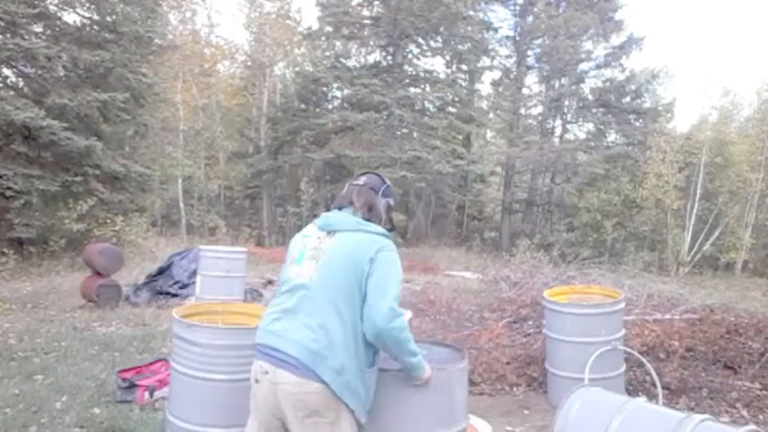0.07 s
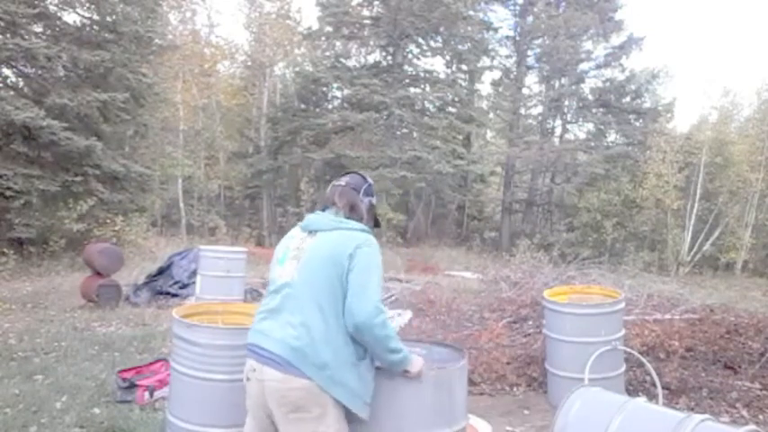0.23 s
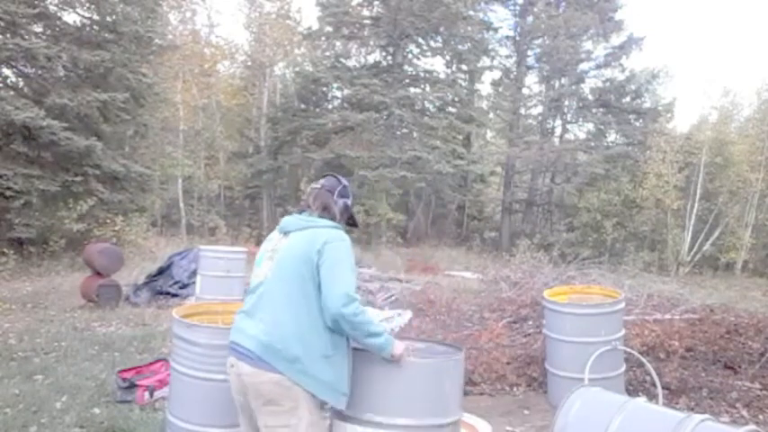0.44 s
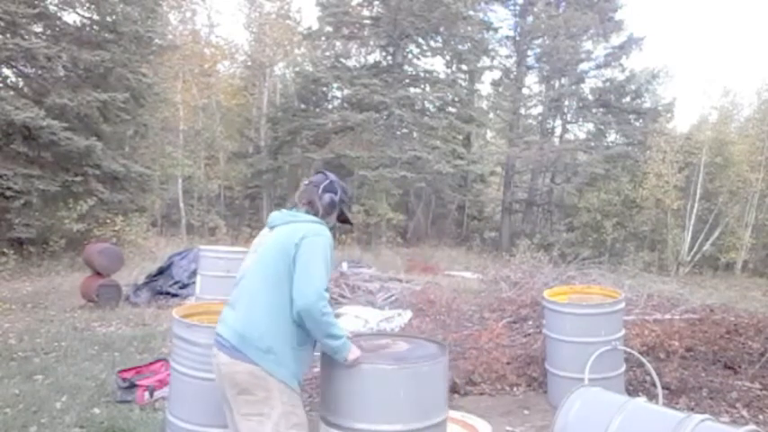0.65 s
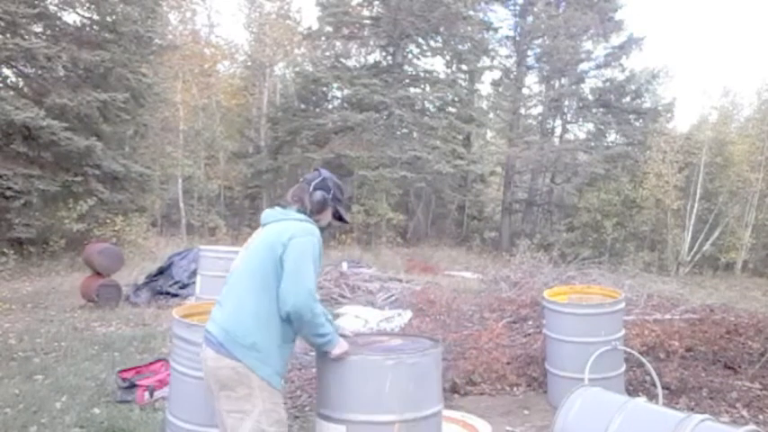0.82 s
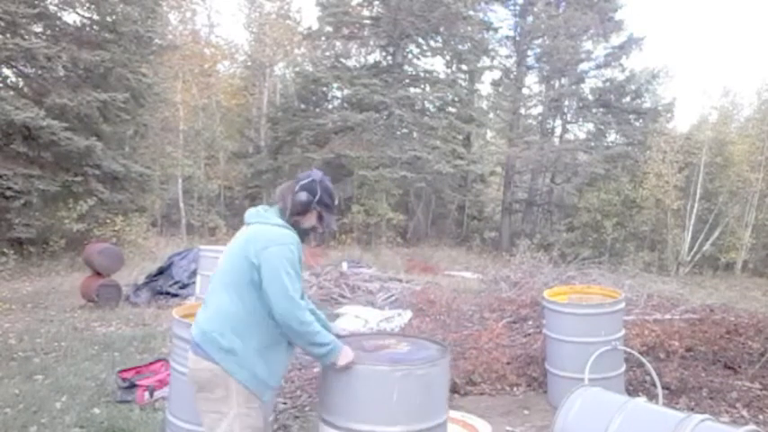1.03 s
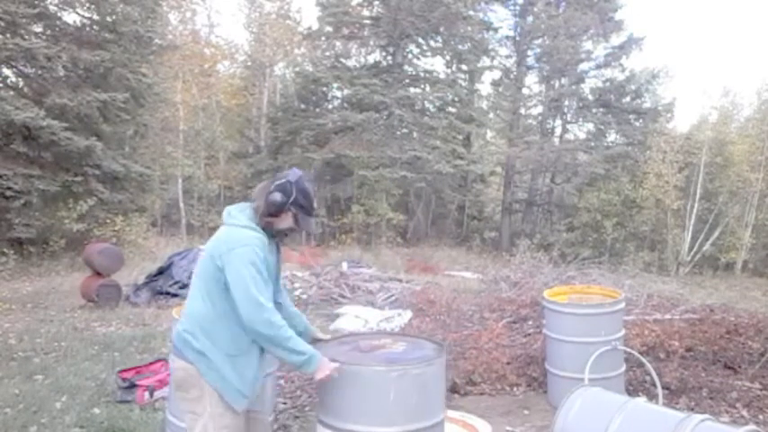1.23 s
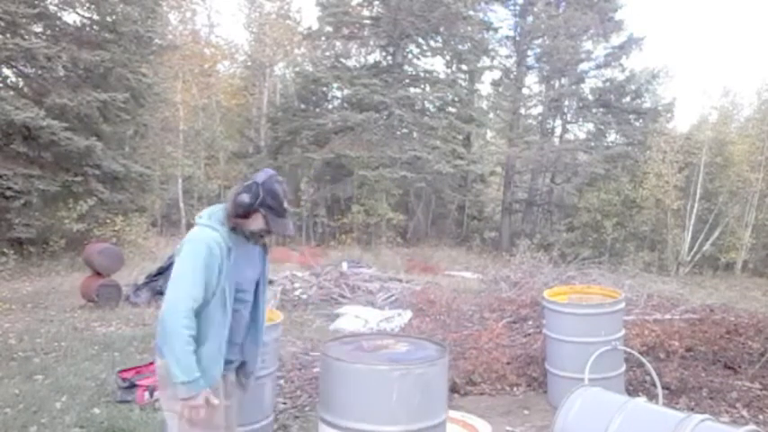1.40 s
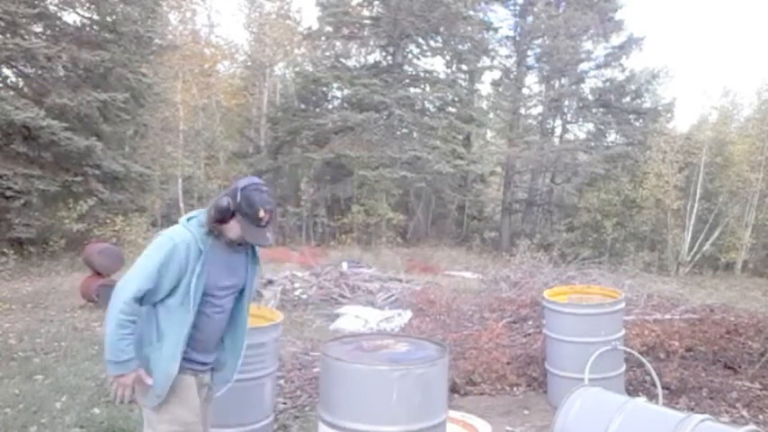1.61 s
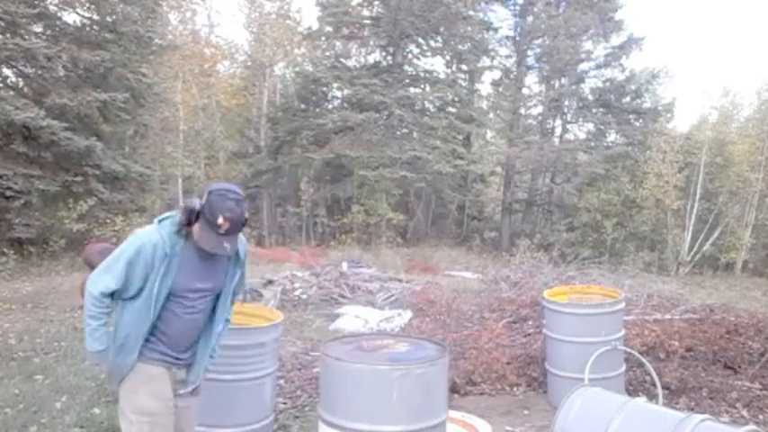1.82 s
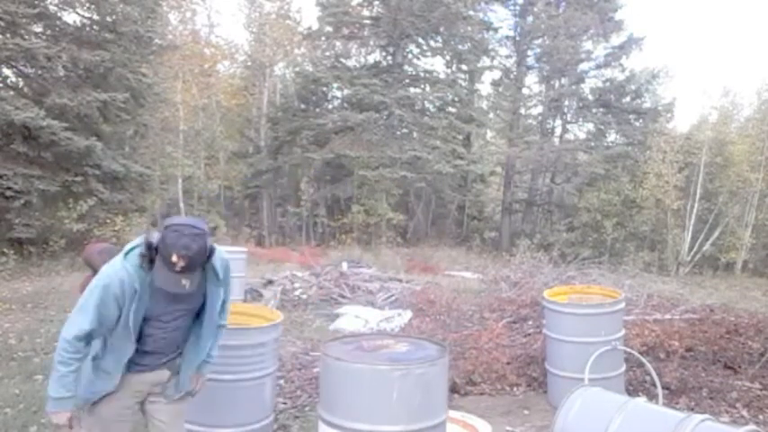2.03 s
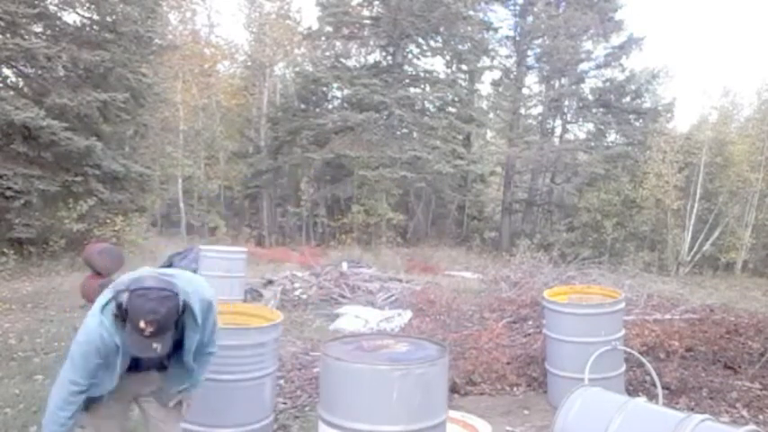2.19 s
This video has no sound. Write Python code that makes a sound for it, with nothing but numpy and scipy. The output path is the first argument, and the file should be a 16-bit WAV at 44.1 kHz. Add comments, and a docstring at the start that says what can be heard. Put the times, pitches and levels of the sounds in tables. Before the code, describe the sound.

An empty steel drum scrapes, thumps and rocks to rest on gritty ground outdoors.

```python
"""A light wind hisses in the trees, and dry leaves and clothing rustle in swells of tiny clicks.
An empty steel drum is tipped: each knock of its rim excites the shell's modes, and its weight thuds
on the soil. It is dragged briefly over grit, where stick-slip friction shakes the shell, then is set
down and rocks on its rim until it settles. Two soft footsteps follow."""
import sys
import numpy as np
from scipy import signal
from scipy.fft import rfft, irfft
from scipy.io import wavfile

SR = 44100
rng = np.random.default_rng(int(sys.argv[2]) if len(sys.argv) > 2 else 0)


def transcribe(signal):
    """Save signal, clipped to [-1, 1], as a 16-bit WAV file at the path in sys.argv[1]."""
    frames = np.atleast_2d(signal).T
    limited = np.clip(frames, -1, 1)
    pcm = np.round(limited * 32767).astype(np.int16)
    wavfile.write(sys.argv[1], SR, pcm)


N = 103635
T = np.arange(N) / SR
RING_S, CUTOFF_HZ = .7, 15800   # length of the drum's impulse response; upper limit of the sound


def from_db(db):
    """Decibels to amplitude ratio: tenfold for every 20 dB."""
    return 10 ** (np.asarray(db) / 20)


def rms_one(x):
    """Normalisation to unit rms."""
    return x / np.sqrt(np.mean(x ** 2) + 1e-20)


def in_time(rows):
    """Linear interpolation of each column at every sample."""
    s, *columns = np.transpose(rows)
    return [np.interp(T, s, c) for c in columns]


def at_hz(rows, hz):
    """Interpolation of each column on a logarithmic frequency axis."""
    f, *columns = np.transpose(rows)
    return [np.interp(np.log(np.maximum(hz, 1)), np.log(f), c) for c in columns]


def colour(x, spectrum):
    """Spectral shaping of a steady signal, at unit rms."""
    db, = at_hz(spectrum, np.arange(N // 2 + 1) * SR / N)
    return rms_one(irfft(rfft(x) * from_db(db), N))


def band(x, low_hz, top_hz):
    """Causal band-pass filtering with second-order slopes."""
    for hz, kind in ((low_hz, "high"), (top_hz, "low")):
        sos = signal.butter(2, np.clip(hz, 10, SR / 2 - 500), kind, fs=SR, output="sos")
        x = signal.sosfilt(sos, x)
    return x


def add(out, start_s, sound):
    """Superposition of a sound on the mix."""
    i = int(max(start_s, 0) * SR)
    out[i:i + len(sound)] += sound[:N - i]


def grains(per_s, spread_db):
    """Shot noise: independent clicks of uneven size, at unit rms."""
    sizes = from_db(spread_db * np.minimum(rng.exponential(1, N), 4)) * rng.choice([-1, 1], N)
    return rms_one(sizes * (rng.random(N) < per_s / SR))


def wind():
    """Turbulent flow noise: air in the trees gives a soft broadband hiss over a faint rumble."""
    # spectrum of the wind: frequency_hz, level_db
    spectrum = [(15, -19), (25, -11), (53, 5), (235, -3), (352, -6.5), (461, -6), (637, -4.5), (929, 0.5),
                (1120, -2.5), (1510, -2), (1780, 0), (4100, -16), (7220, -20), (8050, -14.5), (9990, -33.5),
                (15800, -25.5)]
    # strength of the wind: time_s, level_db
    envelope = [(0, -61), (.5, -53.5), (1.45, -55.5), (1.56, -59), (1.8, -55.5), (2.0, -57.5), (2.15, -59),
                (2.35, -59.5)]
    level_db, = in_time(envelope)
    hiss = colour(rng.standard_normal(N), spectrum)
    return from_db(level_db) * band(hiss, low_hz=67.3, top_hz=SR / 2)


def rustles():
    """Incoherent summation: swells of fine crackle from leaves and cloth add in power."""
    # swells: peak_s, level_db, rise_s, decay_s
    swells = [(0.059, -52.5, 0.0017, 0.0026), (0.087, -54.5, 0.0022, 0.013), (.15, -57, 0.12, 0.16),
              (0.221, -50, 0.0031, 0.0087), (0.388, -56.5, 0.025, 0.14), (.755, -52, 0.06, 0.063),
              (0.964, -46, 0.0068, 0.011), (0.99, -52.5, 0.0044, 0.01), (1.125, -55, 0.06, 0.054),
              (1.305, -54.5, 0.024, 0.027), (1.353, -51, 0.0035, 0.0079), (1.43, -57.5, 0.045, 0.036),
              (1.49, -55, .02, 0.017), (1.672, -53, 0.069, 0.084), (1.865, -47, 0.006, 0.027),
              (1.9, -57, 0.0042, .01), (1.953, -58, 0.0055, 0.052)]
    # spectrum of the crackle: frequency_hz, level_db
    spectrum = [(500, -1), (1800, 4), (3500, 4), (6000, 3.5), (8200, 2), (9600, -11), (11500, -21),
                (14500, -8), (16000, -18.5)]
    power = sum((from_db(db) * np.exp(np.minimum((T - peak_s) / rise_s, (peak_s - T) / decay_s))) ** 2
                for peak_s, db, rise_s, decay_s in swells)
    return np.sqrt(power) * colour(grains(per_s=9000, spread_db=4.5), spectrum)


def drum_modes(lesser_count):
    """Normal modes of the steel shell: the pitch and damped sine of each, strong ones first."""
    # strongest modes, three lists in matching order: pitch_hz, level_db, t60_s
    strong_hz = [117, 152.5, 212, 296, 339, 377, 425.5, 588.6, 634, 707.5, 818, 950.5, 1011, 1127, 1267,
                 1370, 1601, 1632, 1840, 1902, 1975, 2170, 2861, 3279]
    strong_db = [-0.5, -1, 2, -8.5, -5.5, 1.5, 1.5, -1, -5.5, 1.5, -9.5, 0, -2, -0.5, -4, -6.5, -9, -4, -11,
                 -4, -3.5, -4, -0.5, -10]
    strong_t60_s = [0.59, .42, 0.62, 0.82, 0.16, 0.33, .42, 0.6, 0.85, 0.25, 0.77, 0.24, 0.35, 0.29, 0.19,
                    0.49, 0.41, 0.22, 0.16, 0.13, 0.076, 0.17, 0.15, 0.22]
    # trend of the dense lesser modes: pitch_hz, level_db, t60_s
    shell = [(90, -10.5, 0.9), (208, -5.5, 1), (486, 0.5, 0.64), (880, -6.5, 0.54), (1940, 2, 0.2),
             (3780, -1, 0.094), (6800, 5.5, 0.041), (7950, 9, .07), (11000, -12.5, 0.13),
             (15500, 16.5, .05)]
    strong = np.column_stack([strong_hz, np.add(strong_db, 10), strong_t60_s])   # lifted by 10 dB
    steps = (np.arange(lesser_count) + rng.random(lesser_count)) / lesser_count
    lesser_hz = 80 * (CUTOFF_HZ / 80) ** steps
    lesser = np.column_stack([lesser_hz, *at_hz(shell, lesser_hz)])
    hz, db, t60 = np.vstack([strong, lesser]).astype("float32").T[:, :, None]
    t = T[:int(RING_S * SR)].astype("float32")
    decay = np.exp(np.maximum(-float(np.log(1000)) * t / t60, -30))
    return hz[:, 0], from_db(db) * decay * np.sin(2 * np.pi * hz * t)


def strike(modes, low_hz, top_hz, ring_ratio, favoured_hz=None):
    """Impulse response by modal superposition: each place on the rim weights the modes anew."""
    in_phase, spread_db = 0.14, 2.1   # the share that starts in phase makes the contact click
    favour_db, favour_octaves = 9, 0.081
    crack_db, crack_s, crack_reach = -1.5, 0.011, 1.07   # the first instant is stronger and brighter
    hz, sines = modes
    weights = rng.choice([-1, 1], len(hz)) + in_phase
    weights *= from_db(spread_db * rng.standard_normal(len(hz)))
    if favoured_hz:
        weights *= from_db(favour_db * np.exp(-(np.log2(hz / favoured_hz) / favour_octaves) ** 2))
    t = T[:sines.shape[1]]
    # the ground damps the ring at ratios below 1; above 1 it lasts longer
    damping_db_per_s = 120 / RING_S * (1 / np.clip(ring_ratio, .1, 1.2) - 1)
    motion = (weights.astype("float32") @ sines) * from_db(-damping_db_per_s * t)
    crack = band(motion * np.exp(-t / crack_s), low_hz, top_hz * crack_reach)
    return band(motion, low_hz, top_hz) + from_db(crack_db) * crack


def knocks(modes):
    """Impact excitation: each blow of the rim on the ground, and a late footstep beside the drum, leaves the
    shell in free vibration."""
    # blows that ring the shell, all of the rim but the last, a footstep nearby: start_s, level_db, top_hz,
    # low_hz, ring_ratio, favoured_hz
    blows = [(.222, -46.5, 450, 200, 0.24, 380), (.2397, -29.5, 830, 240, 0.72, 357.5),
             (.365, -50, 346, 140, 1.0, 216), (0.426, -49.5, 348, 123, 0.87, 207),
             (0.459, -41.5, 1090, 604, 1.0, 925), (.511, -29.5, 3400, 670, 1.2, 1850),
             (.553, -43.5, 1800, 350, 1, 990), (.594, -23.5, 1030, 354, 0.78, 450),
             (.609, -34.5, 920, 302, 1, 454), (.631, -27.5, 1080, 190, 1, 653),
             (.637, -29, 4900, 600, 0.43, 3770), (.6548, -24.5, 4200, 494, 0.55, 1880),
             (.6585, -26.5, 2240, 1000, 0.79, 1940), (0.9147, -32.5, 1480, 480, 0.89, 687),
             (.9505, -34, 1180, 390, 0.62, 606), (1.028, -39.5, 2160, 292, 0.84, 886),
             (1.031, -34.5, 1000, 172, 0.65, 930), (1.088, -39.5, 606, 244, 0.91, 358),
             (1.099, -41.5, 4130, 760, 1, 1770), (1.207, -48.5, 590, 310, 0.7, 618),
             (1.257, -35, 6100, 447, 0.86, 1580), (1.290, -37.5, 650, 248, .8, 662),
             (1.344, -46.5, 784, 196, 0.68, 620), (1.383, -54, 2200, 1200, .12, 2360),
             (1.635, -53.5, 355, 213, 0.85, 395)]
    out = np.zeros(N)
    for start_s, level_db, top_hz, low_hz, ring_ratio, favoured_hz in blows:
        blow = strike(modes, low_hz, top_hz, ring_ratio, favoured_hz)
        attack_rms = np.std(blow[:SR // 50])   # the first 20 ms
        add(out, start_s, from_db(level_db) * blow / attack_rms)
    return out


def thuds():
    """Damped oscillation: weight landing on soil gives a low decaying tone and a puff of noise."""
    # landings, first the drum and then the feet: start_s, level_db, pitch_hz, t60_s
    landings = [(0.242, -55.5, 108, 0.58), (0.491, -39.5, 95, 0.085), (0.523, -42, 138, .2),
                (0.574, -42.5, 127, 0.39), (0.635, -34.5, 129.6, 0.26), (0.669, -55, 62, 0.93),
                (1.259, -41.5, 209, 0.077), (1.298, -35.5, 118, 0.068), (1.343, -41.5, 78.6, 0.045),
                (1.613, -40.5, 103, 0.066), (1.65, -53.5, 83.6, 0.12), (1.798, -52, 100, .08),
                (1.894, -65, 90, 0.055)]
    # spectrum of the soil: frequency_hz, level_db
    spectrum = [(25, -32), (60, -8), (140, 8.5), (350, -6.5), (700, -15), (2000, -20), (10000, -77)]
    rise_s, puff_db, puff_t60_s = 0.0031, -8.5, .16
    out = np.zeros(N)
    soil = colour(rng.standard_normal(N), spectrum)
    for start_s, level_db, pitch_hz, t60_s in landings:
        t = np.maximum(T - start_s, 0)
        push = -np.sqrt(2) * np.sin(2 * np.pi * pitch_hz * t) * from_db(-60 * t / t60_s)
        puff = soil * from_db(puff_db - 60 * t / puff_t60_s)
        out += 2 * from_db(level_db) * (1 - np.exp(-t / rise_s)) * (push + puff)
    return out


def shake(force, response):
    """Convolution: every contact sets off the same impulse response, scaled to unit energy."""
    return signal.fftconvolve(force, response / np.linalg.norm(response))[:N]


def drag(modes):
    """Stick-slip friction: the rim's catches shake the shell; grit crunches and pings its upper modes."""
    # course of the drag: time_s, slip_db, grit_db
    course = [(.45, -57, -57), (.483, -38, -54), (.487, -33.5, -35.5), (.515, -29, -37), (.538, -27.5, -32),
              (.548, -29, -57), (.565, -25, -56), (.578, -34.5, -31.5), (.592, -30, -56), (.63, -30.5, -44),
              (.66, -37, -39), (.675, -38, -48), (.71, -33.5, -64), (.76, -57, -77)]
    # spectrum of the crunch: frequency_hz, level_db
    spectrum = [(800, 4), (2000, 6), (3800, 12), (5100, 2), (6400, 7), (7200, 1), (8300, -19), (11000, -46),
                (14500, -12), (16000, -52)]
    slip_db, grit_db = in_time(course)
    moving = (T > course[0][0]) & (T < course[-1][0])
    slips = grains(per_s=1300, spread_db=4) * from_db(slip_db) * moving
    grit = grains(per_s=3200, spread_db=1.0)
    pressure = from_db(grit_db) * moving
    body = shake(slips, strike(modes, low_hz=243, top_hz=2930, ring_ratio=0.47))
    pings = shake(grit * pressure, strike(modes, low_hz=2730, top_hz=8550, ring_ratio=0.65))
    crunch = colour(grit, spectrum) * pressure
    return body + from_db(-10.5) * pings + crunch


def scene():
    """Linear superposition: all sources add at one point in the open air."""
    modes = drum_modes(lesser_count=280)
    return (wind() + rustles() + knocks(modes) + thuds() + drag(modes))[None]


def record(dry):
    """Band limiting: a steep elliptic low-pass removes the highest treble."""
    return signal.sosfilt(signal.ellip(12, .1, 80, CUTOFF_HZ, fs=SR, output="sos"), dry)


dry = scene()
out = record(dry)
transcribe(out)
```